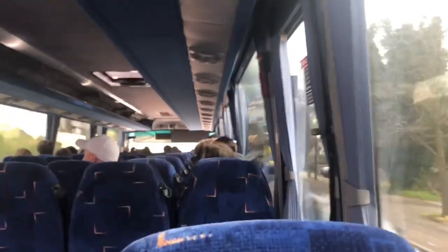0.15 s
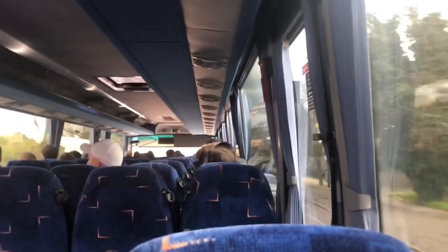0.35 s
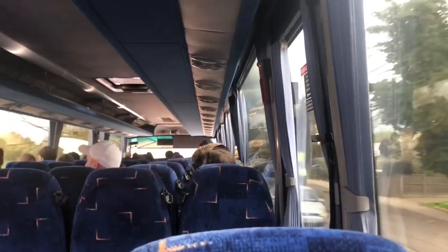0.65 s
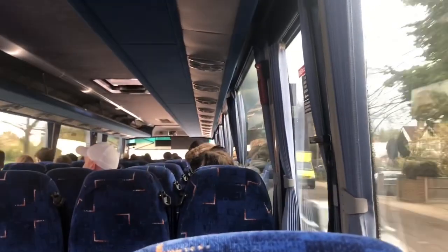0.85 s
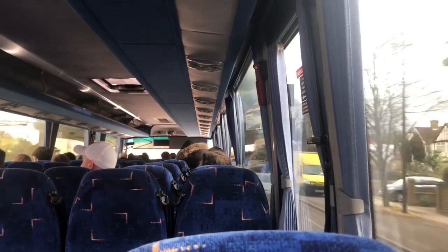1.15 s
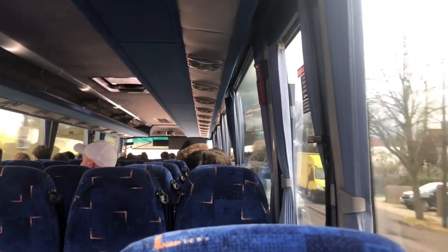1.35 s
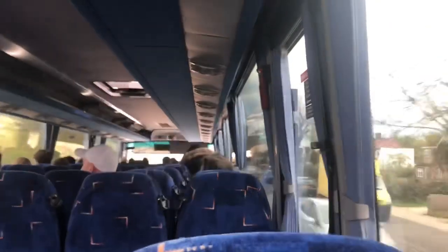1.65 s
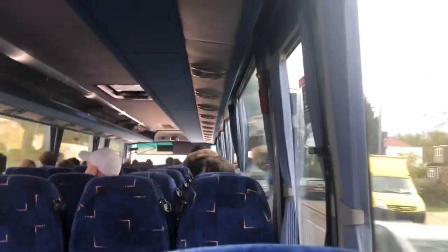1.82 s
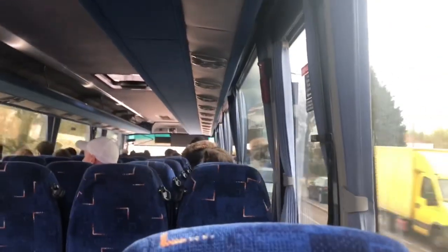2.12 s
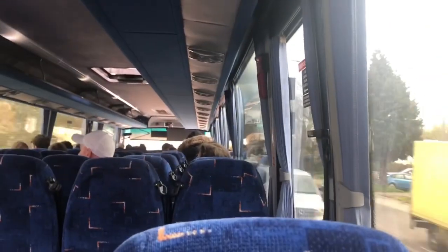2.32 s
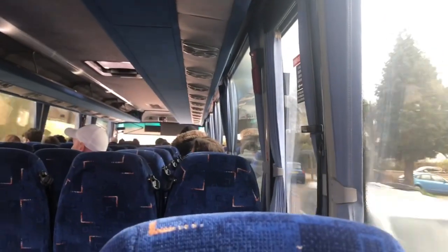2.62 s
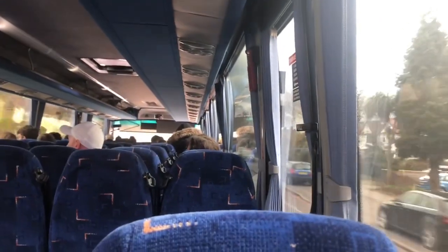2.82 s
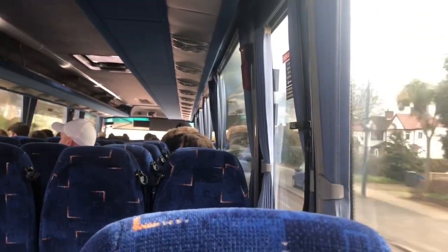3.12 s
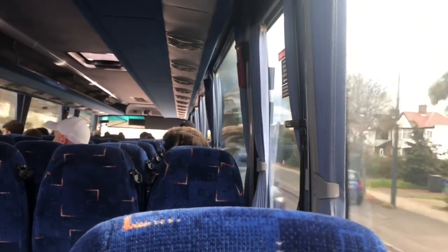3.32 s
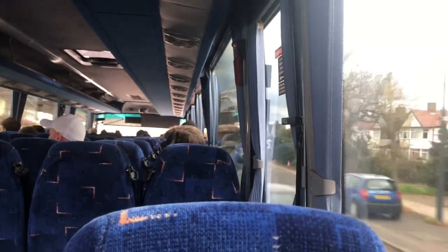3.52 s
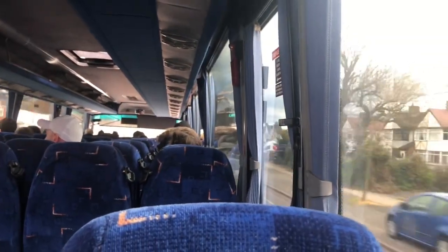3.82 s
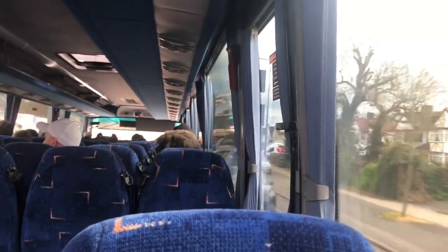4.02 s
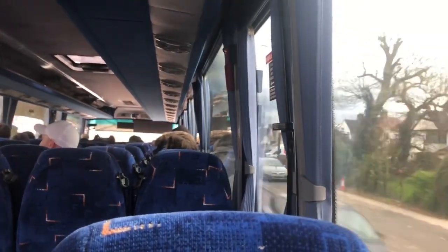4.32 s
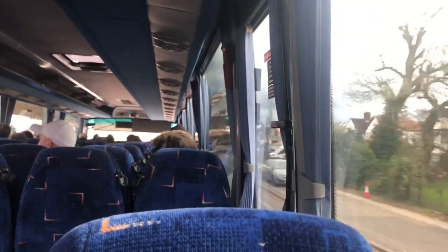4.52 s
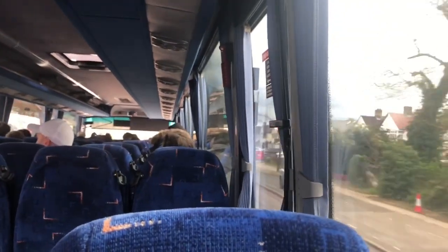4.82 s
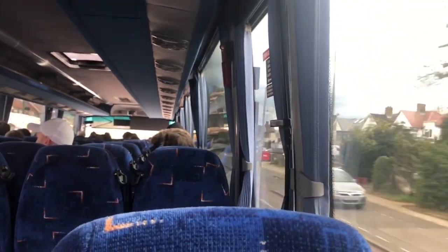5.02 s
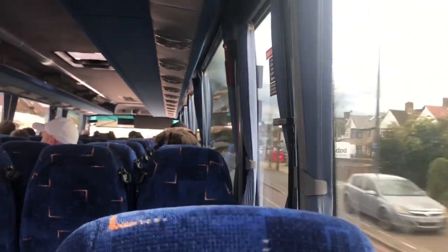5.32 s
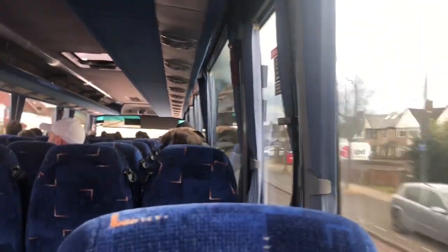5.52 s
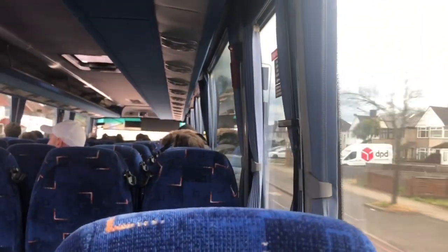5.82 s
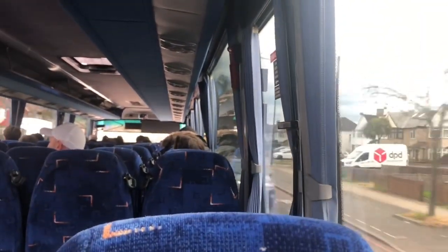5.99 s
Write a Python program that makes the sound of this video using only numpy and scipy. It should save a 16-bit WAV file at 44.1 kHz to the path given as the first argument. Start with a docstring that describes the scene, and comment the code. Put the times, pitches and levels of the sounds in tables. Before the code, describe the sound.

Heard from a seat inside a coach: a deep, throbbing diesel boom rises slightly for nearly three seconds, then the throttle lifts and the boom thins and falls in pitch as the vehicle slows. Tyre rumble, muffled roar and faint air hiss continue beneath. Wheels thump softly over bumps, hollow plastic trim knocks, mostly around one and a half and four seconds, and small metal fittings tick.

```python
"""A low diesel boom fills a coach cabin throughout: the engine pulls gently, then eases off and slows.
Crank-locked sines drive cabin air modes and body panels, with two gears whining and narrow noise bands ringing.
Filtered noise makes the tyre rumble, the floor's drumming, the roar and the air hiss.
Bumps heave the body and thump; decaying sines and noise bursts make trim knock and fittings tick and scrape."""
import sys
import numpy as np
from scipy.fft import rfft, irfft, next_fast_len
from scipy.io import wavfile
from scipy.ndimage import uniform_filter1d, map_coordinates

SR = 44100
rng = np.random.default_rng(int(sys.argv[2]) if len(sys.argv) > 2 else 0)


def wav_out(sig):
    """Save sig, one row per channel (or a flat mono array), as 16-bit PCM at SR to the path in sys.argv[1]."""
    wavfile.write(sys.argv[1], SR, np.round(np.clip(np.atleast_2d(sig).T, -1, 1) * 32767).astype(np.int16))


N = 271215
BURST = SR // 4  # longest burst, in samples
TOP_HZ = 15800

# crankshaft speed: (t/s, rotation/(turns per s))
SPEED = [(0, 23.45), (.5, 23.88), (1, 24.42), (1.6, 25), (2.3, 25.7), (2.7, 25.86), (3.1, 25.66),
         (3.5, 25.1), (3.9, 24.68), (4.3, 24.22), (4.7, 23.44), (5, 22.9), (5.4, 22.22), (5.7, 21.5),
         (5.9, 21.07), (6.15, 20.55)]
# throttle opening: (t/s, opening/0-1)
LOAD = [(0, 0.91), (.5, 0.76), (1.7, 0.8), (2.55, 0.89), (2.68, 0.53), (2.86, 0.59), (3.1, 0.4),
        (3.35, 0.09), (6.15, 0)]
CRUISE_TURNS_PER_S, FIRINGS_PER_TURN = 25, 3

# orders that drive cabin air modes, levels at resonance:
# (multiple of crankshaft speed, mode f/Hz, width/Hz, pulling level/dB, coasting level/dB, throb/0-1)
BOOM = [(3, 70.2, 34, -15.5, -31.5, 0.22), (4.5, 109.3, 10, -17.5, -30.5, 0.3),
        (6, 145.25, 10.8, -16.5, -25.5, 0.04)]
# low, rough engine orders: (multiple of crankshaft speed, pulling level/dB, coasting level/dB)
GROWL = [(1.5, -42.5, -48), (2.5, -37, -40.5), (3.5, -38, -43), (5.5, -34, -45), (6.5, -40, -46.5),
         (7, -38, -43.5), (9, -49.5, -39.5), (10, -51.5, -47), (11, -49, -50), (12, -53.5, -58.5)]
# higher orders that excite body panels, levels away from resonance:
# (multiple of crankshaft speed, pulling level/dB, coasting level/dB, panel f/Hz, width/Hz, lift/dB)
PANELS = [(8, -40.5, -42.5, 195, 10, 7), (13, -47, -51.5, 278, 12, 8), (16, -52, -51.5, 342, 34, 8.5),
          (18, -50, -54.5, 410, 34, 11.5), (35, -54.5, -65, 895, 60, 6), (36, -65, -63, 780, 60, 6),
          (39, -66, -60, 838, 40, 11), (40, -66, -65, 930, 50, 8), (44, -63, -60, 1078, 30, 7)]

# tooth-meshing rates of the lower and the upper gear: (multiples of crankshaft speed)
GEAR_ORDERS = (23.96, 25.16)
# whine as the pressure on the teeth comes and goes: (t/s, lower gear level/dB, upper gear level/dB)
WHINE = [(0, -45, -43), (.9, -44, -41), (1.25, -45, -50), (1.6, -53, -48), (1.9, -52, -42), (2.4, -52, -44),
         (2.9, -54, -57), (3.6, -51, -56), (4.2, -43.5, -53), (4.8, -46, -47), (5.3, -55, -42),
         (5.7, -50, -48), (6, -43, -40), (6.15, -46, -39.5)]

# narrow resonances of engine casing and air ducts: (f/Hz, width/Hz, pulling level/dB, coasting level/dB)
RINGS = [(642, 39, -48, -51), (784, 36, -62, -51), (930, 36, -56.5, -54.5), (1206, 45, -54.5, -58),
         (1768, 45, -63.5, -61.5), (1932, 29, -57.5, -71), (2133, 51, -63, -63), (2507, 45, -63.5, -65),
         (2930, 57, -60, -66.5), (3533, 29, -72, -64.5), (3970, 140, -65, -68), (4375, 230, -66.5, -69),
         (6190, 80, -70, -79.5), (7650, 110, -73.5, -80), (11066, 100, -84.5, -89.5)]
RING_FLUTTER, RING_WAVER_DB = .25, 1.2

# coarseness of the road: (t/s, rumble level/dB against an average road)
ROAD = [(0, 8), (.36, 0), (.9, 1), (1.35, 5), (1.95, 2), (2.5, 3), (3.52, -3), (3.85, 1), (4.55, 1.5),
        (4.92, -3.5), (6.15, -6)]
# noise spectra, relative before scaling to rms 1: (f/Hz, level/dB)
SUSPENSION = [(14, -32.5), (25, -9), (32, -7), (39, 17.5), (52, 29.5), (62, -5), (90, -63)]
FLOOR = [(35, -67), (52, -6.5), (62, -10.5), (80, 7.5), (100, 3.5), (120, -10), (140, -34), (200, -62)]
TYRES = [(80, -54), (120, -6), (150, 3.5), (200, -1), (245, -5), (285, -6), (340, -17.5), (500, -42)]
ROAR = [(180, -41.5), (300, -1), (400, 1.5), (500, 0), (640, -1), (730, -5.5), (920, -7), (1080, -9.5),
        (1250, -10), (1600, -15), (2000, -18.5), (2300, -35), (4000, -41.5)]
HISS = [(1000, -34.5), (2200, 3), (3000, 3.5), (4200, -3), (5200, -5), (7600, -8.5), (9000, -13),
        (11500, -17.5), (13000, -22), (15800, -23)]
# road layers before bumps: (level/dB on an average road, level/dB per dB of rumble)
HEAVE_DB, HEAVE_FOLLOWS = -35, 1
DRUM_DB, DRUM_FOLLOWS = -25, 1
TYRE_DB, TYRE_FOLLOWS = -29, 0.89
# saloon noise before bumps: (level/dB coasting at cruise, rise/dB at full throttle, rise/dB per turn/s)
ROAR_DB, ROAR_PULL_DB, ROAR_SPEED_DB = -39, 4, .5
HISS_DB, HISS_PULL_DB, HISS_SPEED_DB = -55, 3, .5
# early copies of the hiss: (level/dB of each, longest delay/s)
REFLECTION_DB, REFLECTION_S = -20.5, .012

# bumps in the road: (t/s, heave level/dB, thump level/dB, thump f/Hz)
BUMPS = [(0.021, -27.5, -40, 62.4), (0.498, -28, -19, 74.4), (0.86, -29, -17, 77.6), (1.311, -30, -20, 63),
         (1.602, -22.5, -14, 66.5), (2.281, -42, -11.5, 73.7), (3.021, -20.5, -15, 72.2),
         (3.85, -31, -12.5, 70.3), (4.113, -26, -12, 59.5), (4.58, -24, -10.5, 78.8),
         (5.405, -60, -13.5, 81.7), (5.685, -57, -12, 73.3)]
HEAVE_RISE_S, HEAVE_T60_S = 0.017, 0.67

# ticks of small metal fittings: (t/s, bright crack level/dB, click level/dB, ring level/dB)
TICKS = [(0.099, -39, -37.5, -40.5), (1.435, -37, -47, -57), (1.5544, -51, -58, -68),
         (1.594, -50, -52, -66), (1.9624, -50, -57, -68), (2.0263, -48, -52, -68), (2.1321, -48, -53, -68),
         (2.2847, -55, -53, -66), (2.3216, -48, -53, -65), (2.8828, -53, -58, -70), (3.2165, -40, -45, -61),
         (3.9494, -54, -56, -68), (4.0806, -46, -47.5, -57), (4.3575, -47, -48, -57),
         (5.1352, -53, -56, -70), (5.3991, -53, -60, -70)]
# modes of a fitting: (f/Hz, level/dB against the ring, t60/s)
FITTING = [(5000, -3.5, 0.076), (7330, -7, 0.02), (11030, -6.5, 0.049)]
TICK_REBOUND_S, TICK_REBOUND_DB = .032, -11  # delay, and level against the first crack
CHATTER_S, CHATTER_DB = 0.33, -41  # span after a bump, and weakest level against its heave

# trim knocks: (t/s, snap level/dB, panel level/dB, blow centre f/Hz, blow width/Hz, ring t60/s)
KNOCKS = [(0.1, -45, -25.5, 950, 700, 0.075), (.379, -43.5, -49, 1200, 300, 0.049),
          (1.4357, -30.5, -18.5, 1110, 620, 0.06), (1.496, -50, -34, 1260, 450, 0.05),
          (1.596, -45.5, -24.5, 850, 450, 0.05), (1.645, -42.5, -42, 1200, 300, 0.054),
          (1.672, -56, -31, 700, 300, 0.055), (1.7295, -43.5, -37, 1220, 300, 0.065),
          (2.633, -56, -32, 700, 400, 0.05), (4.078, -32.5, -27.5, 1480, 700, 0.066),
          (4.135, -48, -37, 1210, 350, 0.07), (4.1836, -48, -30.5, 1210, 190, 0.085),
          (5.281, -55, -37.5, 1720, 300, 0.16)]
# modes of a hollow trim panel: (f/Hz, relative level/dB, ring time as a share of the knock's t60)
PANEL_MODES = [(378, 7.5, 1.8), (570, -7, 0.91), (716, 1.5, 1.3), (870, -2, 1.3), (1044, 0.5, 0.67),
               (1205, -0.5, 0.69), (1345, -3, 0.9), (1517, -8.5, 0.56), (1760, -11, 0.7)]
# resonances of the plastic trim: (f/Hz, width/Hz, relative level/dB)
TRIM = [(3720, 1200, 5), (4100, 300, 0), (4600, 350, 0), (6100, 1600, -9), (8600, 4700, -11.5)]
# first flex of the struck spot: (level/dB against the panel, t60/s)
PUSH_DB, PUSH_T60_S = 4, .018
# scattering among the seats: (delay/s, level/dB against the panel, t60/s)
SCATTER_DELAY_S, SCATTER_DB, SCATTER_T60_S = 0.0017, -10.5, 0.053
# lower band of the scattered sound: (share of the blow's frequency, relative level/dB)
UNDERTONE_SHARE, UNDERTONE_DB = .68, -7.5
SNAP_DELAY_S, SNAP_LIFE = .0022, 0.62  # life is the snap's t60 as a share of the knock's
# rebound of the snap: (delay/s after the blow, level/dB against the snap)
KNOCK_REBOUND_S, SNAP_REBOUND_DB = 0.016, -6

# fittings that rub for a moment: (t/s, length/s, peak level/dB)
SCRAPES = [(0.197, 0.04, -56.5), (1.696, 0.03, -55.5)]


def amp(db):
    """Amplitude ratio from the decibel law."""
    return 10 ** (np.asarray(db) / 20)


def unit(x):
    """Normalisation to rms 1 equalises signal power."""
    return x / np.sqrt(np.mean(x ** 2) + 1e-20)


def curves(rows):
    """Linear interpolation gives each column after t a value at every sample."""
    times, *columns = np.transpose(rows)
    return [np.interp(np.arange(N) / SR, times, column) for column in columns]


def wobble(rate):
    """Spline interpolation of random knots, rate per second, gives a smooth random curve."""
    knots = rng.standard_normal(int(N * rate / SR) + 4)
    return map_coordinates(knots, [np.arange(N) * rate / SR])


def filtered(x, response):
    """Linear filtering is multiplication of the spectrum by a frequency response."""
    size = next_fast_len(N + SR // 4)
    return irfft(rfft(x, size) * response(np.fft.rfftfreq(size, 1 / SR)), size)[:N]


def noise(spectrum):
    """Spectral shaping colours white noise, here to rms 1 on a logarithmic frequency axis."""
    f, db = np.transpose(spectrum)
    # bands outside the table are all but silent
    gain = lambda hz: amp(np.interp(np.log(hz + 1), np.log(f), db, -120, -120))
    return unit(filtered(rng.standard_normal(N), gain))


def resonant(modes):
    """Resonance concentrates white noise around each (f/Hz, width/Hz, level/dB); rms is 1."""
    def gain(f):
        return sum(amp(db) / (1 + ((f - hz) / (width / np.sqrt(2))) ** 2) for hz, width, db in modes)
    return unit(filtered(rng.standard_normal(N), gain))


def steadied(x, seconds):
    """Division by the local rms removes slow swells and leaves fast flutter."""
    size = max(int(seconds * SR), 1)
    power = uniform_filter1d(uniform_filter1d(x ** 2, size), size)
    return x / np.sqrt(np.abs(power) + 1e-6)


def tone(hz, s):
    """Simple harmonic motion: a sine of rms 1 that starts at s and lasts one burst."""
    out, start = np.zeros(N + SR), int(np.clip(round(s * SR), 0, N - 1))
    out[start:start + BURST] = np.sqrt(2) * np.sin(2 * np.pi * hz * np.arange(BURST) / SR)
    return out


def add(track, s, source, db, t60, attack):
    """Exponential damping: a burst of the source starts at s and decays by 60 dB in t60."""
    start = int(np.clip(round(s * SR), 0, N - 1))
    t = np.arange(min(BURST, N - start)) / SR
    part = slice(start, start + len(t))
    track[part] += source[part] * amp(db - 60 * t / t60) * (1 - np.exp(-t / attack))


def pace(speed):
    """Relative rotation: crankshaft turns per second above cruising speed."""
    return speed - CRUISE_TURNS_PER_S


def sway():
    """Damped response: every bump raises the heave and the dampers calm it."""
    t = np.arange(N) / SR
    total = np.zeros(N)
    for s, db, _, _ in BUMPS:
        age = np.maximum(t - s, 0)
        total += amp(db - 60 * age / HEAVE_T60_S) * (1 - np.exp(-age / HEAVE_RISE_S))
    return total


def order_tone(crank, multiple, rough):
    """Order locking ties phase to crank angle; random irregularity shakes size and phase."""
    angle = multiple * crank + rng.uniform(0, 2 * np.pi)
    in_phase = (1 + rough * wobble(12)) * np.sin(angle)
    quadrature = rough * wobble(12) * np.cos(angle)
    return np.sqrt(2) * (in_phase + quadrature) / np.sqrt(1 + 2 * rough ** 2)


def driven(load, pull, coast):
    """Forced excitation: the level in dB runs linearly from coasting to pulling with throttle."""
    return amp(coast + load * (pull - coast))


def panel_gain(hz, centre_hz, width, lift_db):
    """Resonance lifts an order while its frequency sweeps past the panel's."""
    return amp(lift_db / (1 + (2 * (hz - centre_hz) / width) ** 2))


def engine(crank, speed, load):
    """Forced resonance: engine orders boom in air modes, growl and make panels sing."""
    out = np.zeros(N)
    for multiple, mode_hz, width, pull, coast, throb in BOOM:
        mode = 1 / np.hypot(1, 2 * (multiple * speed - mode_hz) / width)
        out += driven(load, pull, coast) * mode * order_tone(crank, multiple, rough=throb)
    for multiple, pull, coast in GROWL:
        out += driven(load, pull, coast) * order_tone(crank, multiple, rough=0.46)
    for multiple, pull, coast, panel_hz, width, lift_db in PANELS:
        lift = panel_gain(multiple * speed, panel_hz, width, lift_db)
        out += driven(load, pull, coast) * lift * order_tone(crank, multiple, rough=0.14)
    return out


def gears(crank):
    """Tooth meshing gives two tones nearly a semitone apart; backlash makes them waver."""
    backlash = unit(1 + 0.17 * wobble(45))
    whine = np.zeros(N)
    for multiple, db in zip(GEAR_ORDERS, curves(WHINE)):
        whine += amp(db) * order_tone(crank, multiple, rough=0.11)
    return backlash * whine


def rings(crank, load):
    """Fixed resonances sing, amplitude-modulated at each firing, their balance set by throttle."""
    flutter = unit(1 + RING_FLUTTER * np.cos(FIRINGS_PER_TURN * crank))
    out = np.zeros(N)
    for hz, width, pull, coast in RINGS:
        waver = amp(RING_WAVER_DB * wobble(7))
        out += driven(load, pull, coast) * waver * resonant([(hz, width, 0)])
    return flutter * out


def road(heaving):
    """Random excitation by the road shakes suspension, floor and tyres; bumps lift the first two."""
    coarse = curves(ROAD)[0]
    heave_size = amp(HEAVE_DB + HEAVE_FOLLOWS * coarse) + heaving
    drum_size = amp(DRUM_DB + DRUM_FOLLOWS * coarse) + 0.2 * heaving
    tyre_size = amp(TYRE_DB + TYRE_FOLLOWS * coarse)
    heave = heave_size * steadied(noise(SUSPENSION), seconds=0.086)
    drum = drum_size * steadied(noise(FLOOR), seconds=0.0083)
    tyres = tyre_size * steadied(noise(TYRES), seconds=0.57)
    return heave + drum + tyres


def reflected(x):
    """Interference with early copies from windows, racks and seat backs ripples the spectrum."""
    copies = rng.uniform(size=(8, 2))  # share of the longest delay, phase in turns

    def response(hz):
        phases = [hz * REFLECTION_S * late + turn for late, turn in copies]
        return 1 + sum(amp(REFLECTION_DB) * np.exp(-2j * np.pi * phase) for phase in phases)
    return unit(filtered(x, response))


def cabin(crank, speed, load, heaving):
    """Broadband roar and hiss grow with speed, throttle and heave; firing modulates them softly."""
    roar_db = ROAR_DB + ROAR_PULL_DB * load + ROAR_SPEED_DB * pace(speed)
    hiss_db = HISS_DB + HISS_PULL_DB * load + HISS_SPEED_DB * pace(speed)
    firing = np.cos(FIRINGS_PER_TURN * crank)
    roar = amp(roar_db + 1.0 * wobble(14)) * (1 + 0.052 * firing) * noise(ROAR)
    hiss = amp(hiss_db + 0.72 * wobble(13)) * (1 + 0.033 * firing) * reflected(noise(HISS))
    return (roar + hiss) * (1 + 2.0 * heaving)


def thumps():
    """Impulsive excitation: a wheel crossing a bump rings a low air mode of the saloon."""
    out = np.zeros(N)
    for s, _, db, hz in BUMPS:
        add(out, s, tone(hz, s), db, t60=0.31, attack=0.023)
    return out


def fittings():
    """Impact makes loose metal crack, ring and rebound; bumps also leave a faint random chatter."""
    out = np.zeros(N)
    click = steadied(resonant([(5000, 3600, 13.0), (8250, 3000, 1.0), (11300, 2100, -7.0)]), seconds=.003)
    crack = steadied(resonant([(8000, 3500, 0), (11500, 3000, -2)]), seconds=.001)
    for s, crack_db, click_db, ring_db in TICKS:
        add(out, s, crack, crack_db, t60=0.0064, attack=0.0001)
        add(out, s, click, click_db, t60=0.045, attack=0.00014)
        for hz, mode_db, t60 in FITTING:
            add(out, s, tone(hz, s), ring_db + mode_db, t60, attack=0.00043)
        add(out, s + TICK_REBOUND_S, crack, crack_db + TICK_REBOUND_DB, t60=0.01, attack=0.00022)
    for s, heave_db, _, _ in BUMPS:
        for when, strength in rng.uniform(size=(7, 2)):
            chatter_db = heave_db + CHATTER_DB + 6 * strength
            add(out, s + CHATTER_S * when, click, chatter_db, t60=0.093, attack=0.001)
    return out


def trim():
    """Modal impact: a blow flexes and rings the hollow panel; its edge snaps shut and rebounds once."""
    out, snap = np.zeros(N), steadied(resonant(TRIM), seconds=0.003)
    mode_hz, mode_db, life = np.transpose(PANEL_MODES)
    for s, snap_db, panel_db, blow_hz, width, t60 in KNOCKS:
        # closeness to the blow's centre frequency favours a mode
        size = amp(mode_db) / np.hypot(1, 2 * (mode_hz - blow_hz) / width)
        for hz, gain, share in zip(mode_hz, size / np.linalg.norm(size), life):
            detuned_hz = hz * (1 + 0.008 * rng.standard_normal())
            add(out, s, gain * tone(detuned_hz, s), panel_db, share * t60, attack=0.0007)
        add(out, s, tone(blow_hz, s), panel_db + PUSH_DB, PUSH_T60_S, attack=0.0015)

        undertone = (UNDERTONE_SHARE * blow_hz, 260, UNDERTONE_DB)
        scatter = steadied(resonant([(blow_hz, width, 0), undertone]), seconds=0.0031)
        add(out, s + SCATTER_DELAY_S, scatter, panel_db + SCATTER_DB, SCATTER_T60_S, attack=0.0025)

        snap_t60 = SNAP_LIFE * t60
        add(out, s + SNAP_DELAY_S, snap, snap_db, snap_t60, attack=0.00046)
        add(out, s + KNOCK_REBOUND_S, snap, snap_db + SNAP_REBOUND_DB, snap_t60, attack=0.0024)
    return out


def scrapes():
    """Friction: a slipping fitting gives a short, thin swell of gritty noise."""
    t = np.arange(N) / SR
    hard = resonant([(7000, 2500, 1.5), (10100, 2600, -5.5), (12800, 2000, -6.5)])
    grit = unit(amp(4 * wobble(400)) * hard)
    swell = np.zeros(N)
    for s, length, db in SCRAPES:
        swell += amp(db) * np.sin(np.pi * np.clip((t - s) / length, 0, 1))
    return grit * swell


def scene():
    """Linear superposition of all sources, which share crank angle, throttle and heave."""
    speed = curves(SPEED)[0]
    crank = 2 * np.pi * np.cumsum(speed) / SR  # angle in radians
    load = np.clip(curves(LOAD)[0], 0, 1)
    heaving = sway()
    drive = engine(crank, speed, load) + gears(crank) + rings(crank, load)
    ride = road(heaving) + cabin(crank, speed, load, heaving) + thumps()
    return (drive + ride + fittings() + trim() + scrapes())[None]


def record(dry):
    """Band limitation: an ideal low-pass filter removes everything from TOP_HZ upwards."""
    return filtered(dry[0], lambda hz: hz < TOP_HZ)[None]


dry = scene()
out = record(dry)
wav_out(out)
```